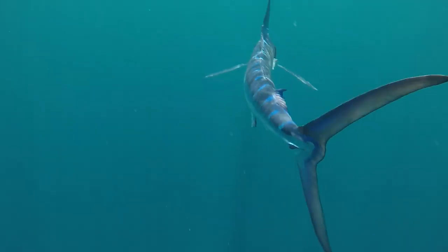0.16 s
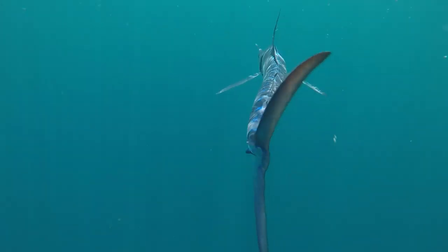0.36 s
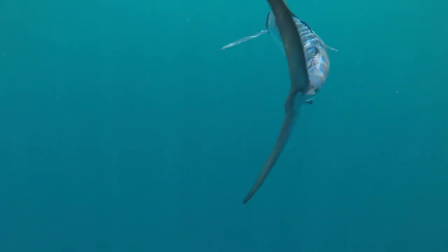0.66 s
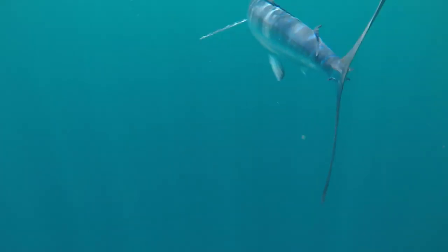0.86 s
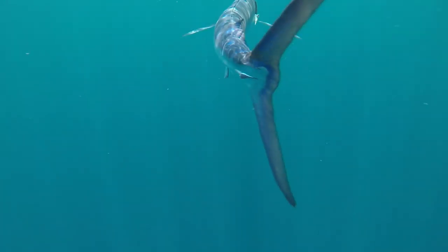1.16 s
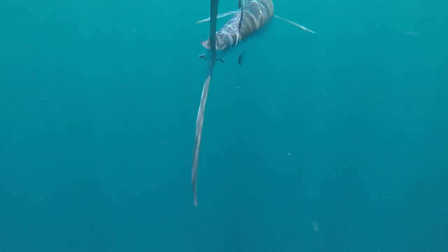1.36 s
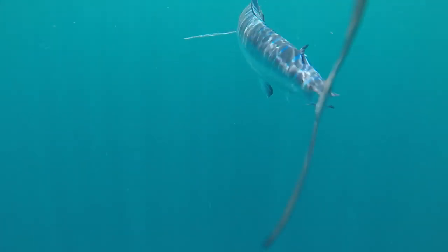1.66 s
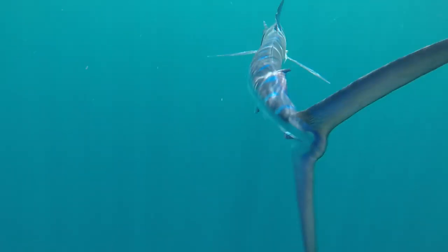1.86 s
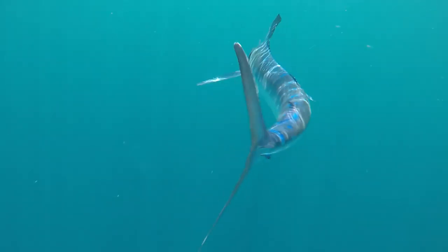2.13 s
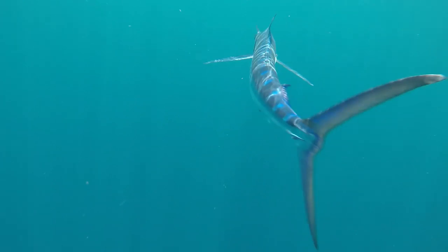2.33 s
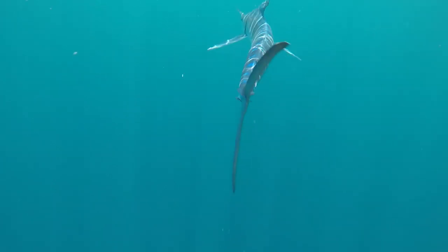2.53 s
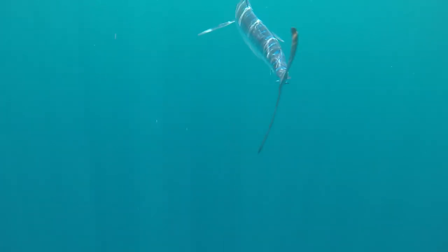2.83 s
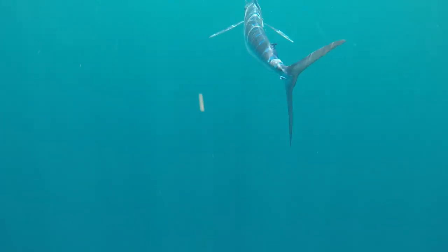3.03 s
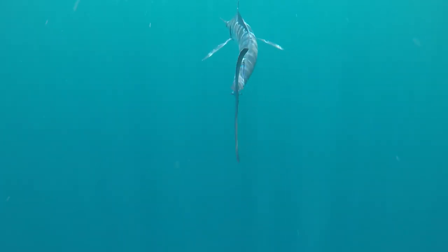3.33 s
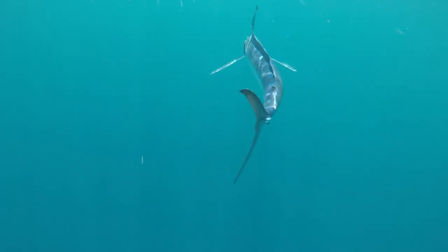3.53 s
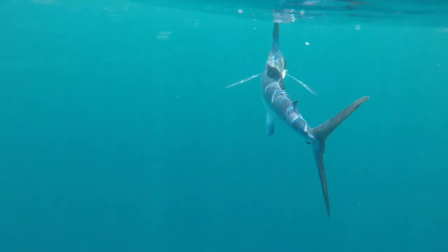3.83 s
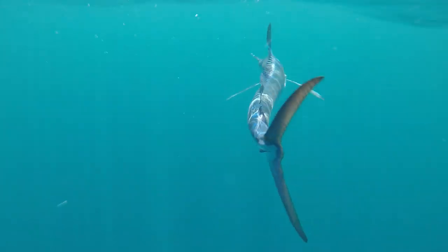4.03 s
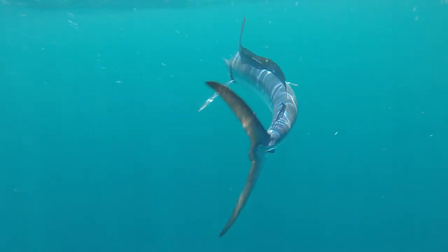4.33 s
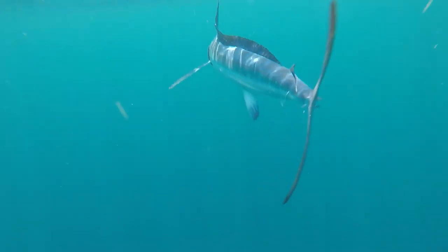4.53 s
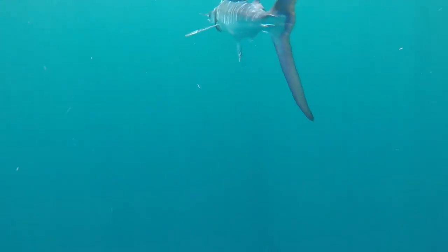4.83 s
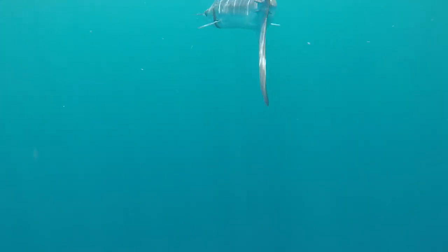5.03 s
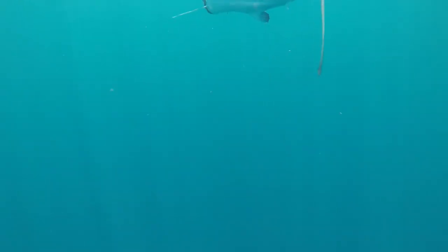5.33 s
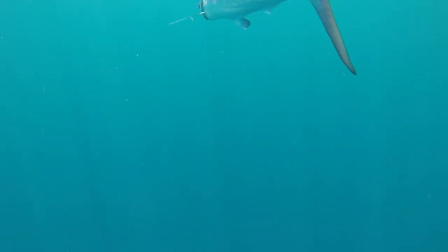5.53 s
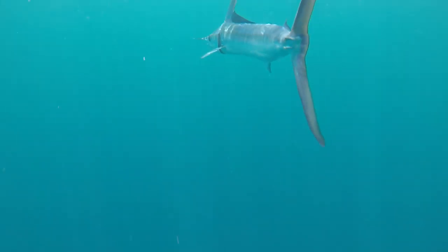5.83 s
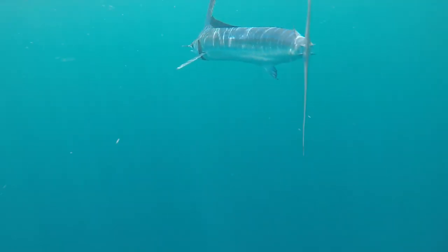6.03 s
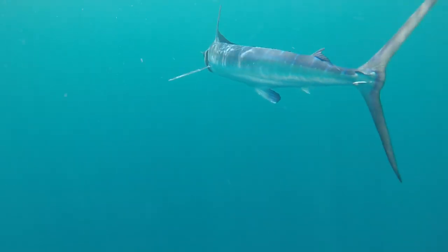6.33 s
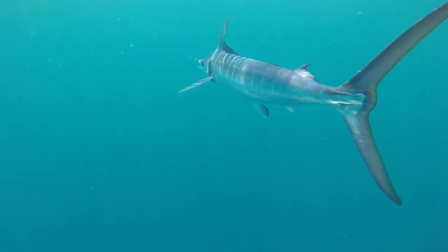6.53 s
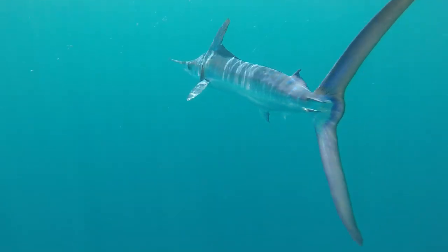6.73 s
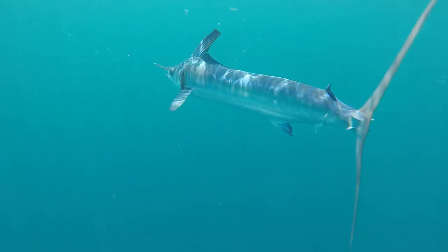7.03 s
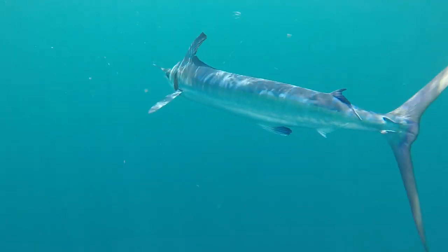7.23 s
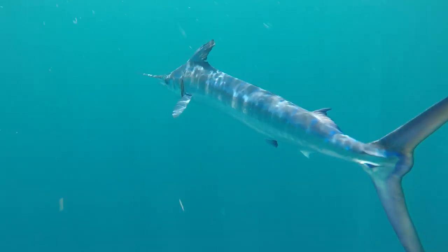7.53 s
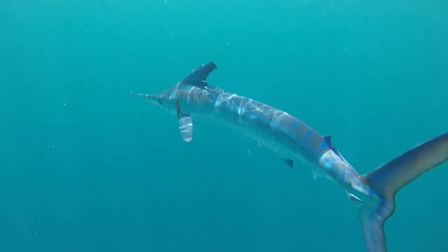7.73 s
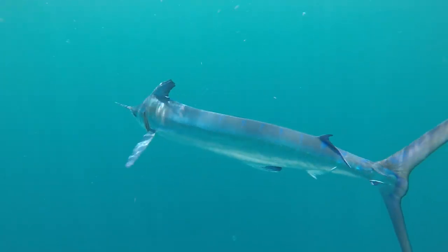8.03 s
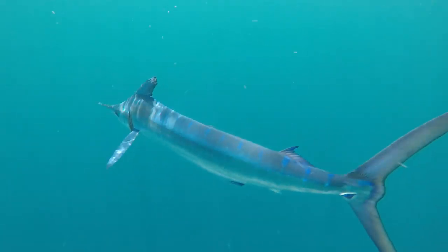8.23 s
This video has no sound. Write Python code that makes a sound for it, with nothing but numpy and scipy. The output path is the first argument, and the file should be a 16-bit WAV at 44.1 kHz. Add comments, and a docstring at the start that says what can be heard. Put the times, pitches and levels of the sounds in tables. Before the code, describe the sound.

A camera housing on a pole is dragged under the sea behind a boat, heard close up from right at its shell. A low wavering shudder and dull knocks run throughout, while bubbles gurgle, tick and pop. Early on, the wet grip gives a short moan and the clamp rasps and creaks. Water drumming on the shell grows into a louder, rough wash in the second half, sputtering near the end.

```python
"""A low shudder and knocks, close up: a camera housing on a pole, dragged under the sea behind a boat.
Shed vortices swing the pole near 45 Hz and it takes jolts; the wet grip moans, its clamp creaks and
rasps, bubbles tick and pop all round. Eddies of the wake drum on the shell and ring its modes, growing
to a rough wash. One microphone, right at the shell; a limiter holds the loudest peaks."""
import sys
import numpy as np
from scipy import signal
from scipy.fft import rfft, irfft
from scipy.io import wavfile
from scipy.ndimage import uniform_filter1d, minimum_filter1d

SR = 44100
rng = np.random.default_rng(int(sys.argv[2]) if len(sys.argv) > 2 else 0)


def wav_out(sig):
    """Save sig, one row per channel (or a flat mono array), as 16-bit PCM at SR to the path in sys.argv[1]."""
    wavfile.write(sys.argv[1], SR, np.round(np.clip(np.atleast_2d(sig).T, -1, 1) * 32767).astype(np.int16))


N = 369558
T = np.arange(N) / SR
HZ = np.arange(N // 2 + 1) * SR / N
CEILING, TOP_HZ = .96, 15400

# stream of bubbles passing the housing: t/s, base level/dB
GURGLE = [(0, -31), (.15, -25.5), (.22, -38), (.6, -32), (.85, -34), (1.1, -31), (1.5, -25), (2.2, -30),
          (2.9, -19.5), (3.5, -10.5), (3.7, -29), (4.1, -17.5), (4.4, -36), (5, -28), (6, -33), (7, -40),
          (7.8, -42), (8.0, -30), (8.38, -38)]
# grit and bursting specks of air: t/s, level/dB, centre f/Hz
TICKS = [(1.7494, -33, 6500), (1.864, -34, 7400), (1.875, -40, 8500), (1.8925, -37, 8900),
         (1.9015, -39, 7000), (1.9205, -45, 7500), (1.937, -42, 7500), (2.3921, -45, 7000),
         (2.879, -49, 7250), (3.1214, -39, 7600), (3.1618, -38, 6800), (3.174, -34, 7500),
         (3.1965, -34, 6300), (3.218, -30, 4700), (3.2307, -37, 7300), (3.2425, -35, 6800),
         (3.262, -40, 5900), (3.4592, -42, 9500), (3.481, -40, 5500), (3.5085, -43, 8500),
         (3.5741, -46, 10500), (3.579, -41, 8870), (4.0009, -46, 9050), (4.4135, -45, 7210),
         (4.7662, -41, 7100), (4.9977, -42, 7800), (5.978, -31, 4100), (6.1061, -43, 9300),
         (6.3668, -41, 7400)]
# the grip slipping evenly: t/s, f/Hz, level/dB
MOAN = [(.33, 213.5, -40), (.355, 213.4, -24.5), (.39, 192, -21), (.43, 214, -29), (.48, 221, -32),
        (.505, 199, -25), (.535, 193.6, -24), (.575, 199, -21), (.60, 185.6, -25.5)]
# its harmonics: multiple, relative level/dB
MOAN_HARMONICS = [(1, -0.5), (2, -13), (3, -9.5), (4, -24.5), (5, -32)]
# wet slips and squirts at the clamp: t/s, length/s, slip rate/Hz, ring f/Hz, width/Hz, level/dB
CREAKS = [(.008, 0.047, 200, 1100, 900, -43), (.07, .015, 300, 1700, 1200, -43),
          (0.099, 0.044, 260, 1500, 1300, -41), (.59, 0.032, 240, 1200, 800, -41),
          (0.689, 0.0063, 300, 1600, 1900, -29), (0.705, 0.0055, 300, 2300, 1900, -36.5),
          (0.768, 0.165, 450, 2540, 1790, -39), (.849, .008, 300, 5300, 2000, -54),
          (1.858, 0.0082, 400, 3440, 1030, -25.5), (1.86, 0.0093, 360, 2200, 930, -22),
          (1.868, 0.0029, 400, 3300, 2400, -32), (1.882, 0.011, 650, 3360, 1200, -28),
          (1.862, 0.048, 550, 8000, 8000, -52), (2.227, 0.02, 310, 4970, 2400, -46),
          (2.27, 0.024, 300, 5300, 2000, -48.5), (3.161, 0.024, 486, 3530, 700, -17.5),
          (3.195, 0.008, 570, 3350, 600, -15), (3.143, .017, 550, 3820, 400, -34),
          (3.217, 0.023, 600, 2120, 2420, -17), (3.162, 0.028, 430, 2300, 1910, -22),
          (3.196, 0.013, 430, 2300, 1800, -26), (3.161, 0.033, 540, 5000, 2600, -36),
          (3.196, 0.011, 460, 4800, 2800, -36), (3.217, 0.028, 420, 5200, 3000, -39),
          (3.284, 0.29, 190, 3500, 420, -45.5)]
# the clamp rasping: t/s, slip rate/Hz, level/dB, factor on its mode pitches as the grip loads it
RASP = [(.768, 115, -28, .92), (.78, 115, -29, 0.98), (.81, 122, -32, 0.97), (.84, 153, -29, 0.89),
        (.87, 155, -31, 1.03), (.89, 160, -30, 1.03), (.92, 180, -23, 1), (.936, 184, -29, 1.05)]
# modes of the clamp: base f/Hz, relative level/dB, t60/s
CLAMP_MODES = [(1790, -6, .016), (2120, 0.5, .024), (2690, -9, .012), (3270, -1, 0.021), (3750, -7, .012),
               (4500, -12, .01), (5600, -26, .006)]
# bubbles, from gulps of air to tiny ticks, and two faint sharp clicks near 3.9 kHz (7.982 and 8.085 s),
# the sound of loud peaks clipping: t/s, level/dB, starting f/Hz, t60/s
POPS_AND_CLICKS = [(.0114, -27, 1030, .035), (.056, -45, 3020, 0.013), (0.076, -28, 1440, 0.026),
                   (.092, -45, 4560, 0.01), (.1052, -25, 2140, 0.018), (0.1127, -21, 977, 0.043),
                   (.113, -29, 3030, 0.015), (.119, -47, 4400, 0.0092), (.1395, -41.5, 6040, 0.0087),
                   (.158, -39, 2100, .015), (0.236, -13.5, 2010, 0.014), (.454, -25, 675, .034),
                   (.597, -9, 556, 0.043), (.85, -34, 4350, 0.019), (.9142, -35, 4460, .012),
                   (1.1058, -40, 4950, .012), (1.157, -9, 668, 0.08), (1.261, -1, 528, 0.042),
                   (1.35, -13, 624, 0.043), (1.417, -5.5, 508, 0.048), (1.46, -36, 5770, .015),
                   (1.62, -7.5, 508, 0.061), (1.675, -3, 426, 0.024), (1.707, -5, 567, 0.031),
                   (1.748, -24, 5440, 0.015), (1.757, -4.5, 640, 0.068), (1.855, -3.5, 673, 0.044),
                   (1.888, -26, 3880, 0.015), (1.9189, -25, 5500, .015), (1.9334, -21, 4770, .016),
                   (2.0303, -11, 1024, 0.029), (2.075, -30, 5290, 0.021), (2.09, -17, 2790, .025),
                   (2.04, -8, 480, .05), (2.11, -12, 496, 0.057), (2.3895, -31, 5360, 0.022),
                   (2.441, -3.5, 614, 0.042), (2.478, -10, 518, .045), (2.578, -1.5, 625, 0.036),
                   (2.6, -15, 1010, 0.042), (2.741, -5.5, 270.2, 0.056), (2.756, 0, 636, 0.046),
                   (2.806, 0, 520, 0.056), (2.8069, -31, 4070, .012), (2.84, -2.5, 766, 0.07),
                   (2.8744, -31, 5570, 0.014), (2.899, 2.5, 626, 0.037), (2.98, -6, 615, 0.044),
                   (3.039, 1, 630, 0.037), (3.083, -21, 5430, 0.0078), (3.133, -4.5, 168, 0.17),
                   (3.2203, -10, 1191, 0.025), (3.228, -9, 2070, .025), (3.2325, -2, 2036, 0.039),
                   (3.2375, -4, 2053, 0.05), (3.246, 0, 513, 0.043), (3.364, -7, 2040, 0.016),
                   (3.458, -20.5, 5265, 0.019), (3.505, -3, 690, 0.043), (3.5076, -33, 4100, .013),
                   (3.5587, -25, 4380, 0.014), (3.591, -6, 518, .051), (3.9003, -12.5, 1526, 0.035),
                   (3.9564, -26, 5660, 0.0094), (4.067, -13, 90.4, .12), (4.0741, -11, 971, 0.027),
                   (4.042, -6, 600, 0.061), (4.066, -9.5, 730, .06), (4.08, -1.5, 268, 0.15),
                   (4.15, -9, 190, 0.11), (4.16, -12.5, 592, 0.13), (4.182, -7, 616, .07),
                   (4.185, -2, 216, 0.11), (4.235, -13.5, 670, 0.082), (4.229, -3.5, 105.3, 0.13),
                   (4.37, -34, 4730, 0.013), (4.4927, -18, 2455, 0.042), (4.563, -14, 93.4, 0.12),
                   (5.016, -6, 585, 0.043), (5.157, -1, 700.5, 0.038), (5.558, -4, 607, .04),
                   (5.679, 1, 506, 0.047), (5.714, -6, 518, 0.044), (5.746, 0, 506, 0.036),
                   (5.91, -11, 598, 0.047), (6.5015, -24, 4940, 0.0098), (6.807, -6, 654, 0.031),
                   (6.841, -24.5, 3940, 0.024), (7.011, -2, 541, 0.041), (7.084, -1, 523.6, 0.052),
                   (7.804, -9, 643, 0.033), (7.875, -12, 1190, 0.037), (7.92, -6, 548, 0.045),
                   (7.972, -12.5, 1910, 0.052), (7.982, -32, 3900, 0.0075), (8.018, -28, 1886, 0.015),
                   (8.04, -20, 1840, 0.034), (8.075, -14, 1760, 0.047), (8.085, -39, 3890, 0.0087),
                   (8.128, -9.5, 1880, 0.067), (8.25, -14, 2420, 0.044), (8.19, -20, 1865, 0.034),
                   (8.295, -15, 1800, 0.042), (8.333, 3, 624, 0.036)]
# their character by pitch: f/Hz, glide, share of noise
RING_KINDS = [(260, -0.18, 0.033), (500, 0.037, 0.18), (1000, .057, 0.2), (2500, .057, 0.11),
              (3900, .043, 0.44)]
# jolts along the pole: t/s, swing of the pole/dB, thud on the shell/dB
JOLTS = [(.01, -10, -19), (0.128, -8, -15), (0.278, -8, -21), (0.314, -16, -14), (0.442, -10, -15),
         (0.589, -27, -13.5), (0.611, -14, -26), (1.16, -11.5, -47), (1.41, -25, -16.5), (1.47, -5.5, -28),
         (1.72, -16, -23), (1.899, -26, -22), (2.22, -21, -13.5), (2.56, -12, -25), (2.83, -22, -8.5),
         (3.0, -14, -18.5), (3.52, 1.5, -22), (3.69, -20, -14.5), (3.77, -12, -31), (3.891, -12, -34),
         (4.0, -13, -19), (4.06, -18, -12), (4.2, -11, -15), (4.55, -22, -32), (5.07, -19, -12),
         (5.819, -20, -1), (5.89, -19, -22), (5.96, -20, -20), (6.17, -25, -26), (6.4, -11, -34),
         (6.52, -22, -6), (6.7, -23, -1), (6.85, -20, -3), (7.17, -6.5, -29), (7.34, -25, -7),
         (7.75, -6, -31), (7.899, -25, -30)]
# steady shudder of the pole: t/s, f/Hz, base level/dB
SHUDDER = [(0, 50, -19.5), (.5, 48.16, -21), (.8, 32.67, -20.5), (1.1, 33.83, -17), (1.3, 39.4, -18.5),
           (1.75, 36.54, -13.5), (2.05, 51, -14.5), (2.25, 42.56, -17), (2.6, 45, -15), (2.8, 34.8, -12),
           (3.45, 33.9, -15.5), (3.65, 37.37, -18.5), (4.1, 57.1, -13.5), (4.4, 46.7, -23.5),
           (4.7, 39.97, -17.5), (5.4, 41.2, -13.5), (5.7, 50.1, -19.5), (6.0, 43.76, -18),
           (6.15, 57.13, -14.5), (6.6, 51.6, -16.5), (6.75, 46.1, -18.5), (7.3, 54.7, -17),
           (7.5, 42.65, -16), (7.85, 37.94, -17), (8.05, 30.2, -19.5), (8.38, 38, -21)]
# the flow stalls: centre t/s, length/s, shudder drop/dB, wake drop/dB (negative lifts)
LULLS = [(0.238, 0.093, 14, 5.5), (0.375, 0.063, 11, 2), (0.547, 0.04, 7, 1), (0.73, 0.033, 5, 2),
         (2.358, 0.031, 11, 3.5), (3.591, 0.07, 17, -1.5), (3.84, 0.12, 2, 2.5), (4.15, 0.037, 22, 1.5),
         (4.292, 0.089, 2, 3), (6.763, 0.029, 3, 10), (7.813, 0.051, -4, 1)]
# modes of the shell: f/Hz, width/Hz, level/dB
SHELL_MODES = [(99, 90, -8), (162, 100, 0), (263, 440, -4), (500, 180, -2), (640, 180, -1), (770, 180, -9),
               (1140, 150, -22), (1230, 210, -22), (1490, 130, -25), (1790, 440, -19), (2000, 220, -14),
               (2380, 570, -29), (2730, 390, -26), (3020, 490, -30), (3560, 320, -40), (3890, 800, -36),
               (4080, 250, -36), (4800, 760, -42), (5490, 600, -43), (5950, 1030, -44), (7200, 1570, -47),
               (7640, 640, -46), (8270, 230, -52), (8880, 1900, -48), (10200, 1800, -57), (11500, 810, -60),
               (12500, 1200, -68), (13500, 900, -72), (14760, 720, -70)]
# pitches at which the shell barely moves under the microphone: f/Hz, width/Hz
SHELL_NULLS = [(910, 40), (1390, 40), (1570, 40), (2200, 70), (3080, 450), (3770, 450), (5640, 590),
               (7960, 40), (8710, 900), (10840, 1500)]
# turned in the wake, the shell is driven in other modes: f/Hz, change side-on/dB, change end-on/dB
TURNED_EQ = [(900, 1, 1.5), (1240, -4, 0.5), (1530, -1, 6.5), (1630, -0.5, 6.5), (1964, -0.5, -4),
             (2150, 4.5, -1), (2580, 2.5, 1), (2700, 0.5, -9.5), (2950, -4.5, -5), (3350, 2, -5),
             (3750, 3, 1.5), (4060, -4, -6), (4440, 2, -0.5), (6000, 0, 2)]
# how the housing faces the flow: t/s, share side-on, share end-on
FACING = [(0, 0.42, 1), (.9, 0.6, 0), (1.3, 0.98, 0.09), (3.0, .9, 0.06), (4.2, 0.4, 0.4), (4.7, .05, 0.2),
          (6.5, .05, .05), (7.7, 0.3, 0.3), (7.9, 0.03, .95), (8.38, 0.01, .95)]
# six eddy sizes, largest first: low f/Hz, high f/Hz, shared surge/dB, own flicker/dB, bursts/dB
EDDY_SIZES = [(68, 120.4, -0.5, 4.5, 5.5), (145.5, 413, 1.3, -1.5, 3.5), (395, 863, 1, 1.28, 2),
              (933, 3160, 1, 1.65, 3.5), (2850, 4700, 2.5, 1.35, 4), (5000, 32000, 0.5, 1.5, 3)]
# the largest eddies: t/s, level/dB
THROB = [(0, -30), (.25, -34.5), (.45, -26), (.6, -37), (.7, -50), (1.2, -44), (1.45, -28), (2.2, -26.5),
         (2.7, -33), (3.3, -28.5), (3.7, -32), (4.15, -21), (4.4, -35), (5.2, -26), (5.9, -29),
         (6.6, -29.5), (7.3, -28.5), (7.8, -30.5), (8.38, -32)]
# the next two sizes: t/s, rumble level/dB, wash level/dB
RUMBLE_AND_WASH = [(0, -30, -31), (.2, -42, -48), (.35, -37.5, -32), (.55, -44, -43), (.72, -44, -34.5),
                   (.95, -50.5, -31), (1.25, -45, -25.5), (1.45, -29.5, -19.5), (1.6, -29.5, -21.5),
                   (1.85, -34, -24), (2.15, -32.5, -24.5), (2.28, -21.5, -22), (2.5, -23, -19.5),
                   (2.72, -32, -24), (3.1, -19, -16), (3.5, -22.5, -20.5), (3.7, -45.5, -30.5),
                   (3.95, -34, -25.5), (4.15, -20, -24.5), (4.35, -30, -26), (4.6, -21.5, -16.5),
                   (4.9, -11.5, -15), (5.3, -14.5, -14), (6.6, -13, -15), (7.3, -16.5, -13.5),
                   (7.66, -23.5, -14), (7.82, -33.5, -18.5), (7.93, -20.5, -12.5), (8.15, -20, -13.5),
                   (8.38, -21, -13.5)]
# the three smallest: t/s, level near 2 kHz/dB, near 4 kHz/dB, above 5 kHz/dB
HISS = [(0, -52, -66, -82), (.12, -51, -67, -85), (.2, -54, -72, -85), (.26, -50, -71, -85),
        (.31, -48, -69, -83), (.4, -51, -70, -82), (.48, -44.5, -65, -77.5), (.65, -45, -60, -76),
        (.75, -41, -58, -74), (.86, -34, -59, -65), (.96, -42.5, -53, -64), (1.15, -42.5, -56, -64.5),
        (1.45, -27.5, -48, -51), (1.75, -29, -43, -52), (2.05, -32.5, -42, -53.5), (2.3, -30.5, -53, -57),
        (2.45, -29.5, -45, -51.5), (2.62, -26.5, -43, -49), (2.85, -31.5, -44.5, -52.5),
        (3.08, -28.5, -41, -49.5), (3.5, -26.5, -43, -51), (3.72, -40.5, -50.5, -57.5),
        (4.3, -34, -48, -52), (4.69, -28.5, -39.5, -48.5), (5.3, -26.5, -45.5, -50),
        (6.35, -25, -44, -50.5), (6.7, -26.5, -45, -56.5), (7.1, -24, -42, -58), (7.66, -24, -42.5, -60.5),
        (7.84, -36, -46, -64), (7.89, -25, -56, -69), (8.0, -21.5, -61, -71), (8.15, -19.5, -58, -72),
        (8.38, -19.5, -60, -76)]
# a jolt's thud in the band of each eddy size: relative level/dB
THUD_BAND_DB = [-2.5, -5, -11, -34.5, -53.5, -64]
# raggedness of the wake: t/s, factor on surge, flicker and bursts
RAGGED = [(0, 0.81), (1, .9), (2.2, 1.08), (3.6, 1.03), (4.3, 0.8), (4.7, 0.63), (6, 0.88), (7.5, 0.78),
          (7.9, 0.64), (8.38, .6)]
# gaps where the wash sputters: centre t/s, length/s, drop/dB
SPUTTER = [(7.86, .02, 6), (7.905, 0.026, 10), (7.957, 0.023, 14), (8.004, 0.02, 17.5), (8.03, .012, 10),
           (8.058, .018, 7), (8.106, 0.03, 15), (8.165, 0.034, 5.5), (8.22, .025, 7.5), (8.27, .015, 2.5),
           (8.315, 0.017, 7.5)]
# factor on that drop for each eddy size
SPUTTER_SHARE = [0.05, .3, .6, 1.02, .5, 0.1]


def undb(db):
    """Decibels to gain."""
    return 10 ** (np.asarray(db) / 20)


def unit(x):
    """Scale to rms 1."""
    return x / np.sqrt(np.mean(x ** 2))


def curves(table):
    """Columns of a table, joined by straight lines in time."""
    s, *columns = np.transpose(table)
    return [np.interp(T, s, column) for column in columns]


def walk(rate_hz):
    """Random levels held 1 / rate_hz seconds and smoothed twice; rms 1."""
    hold = int(SR / rate_hz)
    steps = np.repeat(rng.standard_normal(N // hold + 1), hold)
    return unit(uniform_filter1d(uniform_filter1d(steps, hold), hold)[:N])


def swell(t, rise_s):
    """Smooth rise from 0 to 1."""
    return np.sin(np.pi / 2 * np.minimum(t / rise_s, 1)) ** 2


def resonance(hz, width_hz):
    """Response of one damped mode, gain 1 at its centre."""
    return 1j * HZ * width_hz / (hz ** 2 - HZ ** 2 + 1j * HZ * width_hz)


def through(x, response):
    """Pass a sound through a frequency response."""
    return irfft(rfft(x) * response, N)


def band(x, low_hz, high_hz, order=3):
    """Band-pass a sound and scale it to rms 1."""
    return unit(signal.sosfilt(signal.butter(order, [low_hz, high_hz], "band", fs=SR, output="sos"), x))


def rings(rows):
    """Short gliding rings that swell in; snap adds a puff of noise around the pitch."""
    out = np.zeros(N + SR)
    for s, db, hz, t60, glide, snap in rows:
        t = np.arange(int(t60 * SR)) / SR
        envelope = np.exp(-np.log(1000) * t / t60) * swell(t, .14 * t60)
        ring = np.sin(2 * np.pi * hz * t * (1 + glide * t / t60))
        if snap:
            ring += snap * band(rng.standard_normal(16384), hz / 1.35, hz * 1.45)[-len(t):]
        out[int(s * SR):int(s * SR) + len(t)] += undb(db) * envelope * ring
    return out[:N]


def gurgle(count, low_hz, high_hz):
    """A bed of random bubbles passing the housing; small ones ring high, short and faint."""
    when, smallness, luck = rng.random((count, 3)).T
    s = when * N / SR
    hz = low_hz * (high_hz / low_hz) ** smallness
    scatter_db = -2.5 * np.log(1 - .97 * luck)
    db = np.interp(s, *np.transpose(GURGLE)) - 5 * np.log2(hz / low_hz) + scatter_db
    t60, glide, snap = 28 / hz, np.full(count, .12), np.zeros(count)
    return rings(zip(s, db, hz, t60, glide, snap))


def ticks(rise_s=.00066, half_width_octaves=.37):
    """Grit and bursting specks of air, each a brief wide crack of noise."""
    out, t = np.zeros(N), np.arange(512) / SR
    envelope = t / rise_s * np.exp(1 - t / rise_s)
    spread = 2 ** half_width_octaves
    for s, db, hz in TICKS:
        crack = band(rng.standard_normal(len(t)), hz / spread, min(hz * spread, TOP_HZ))
        out[int(s * SR):int(s * SR) + len(t)] += undb(db) * crack * envelope
    return out


def moan():
    """Even stick-slip of the wet grip: a short harmonic tone."""
    hz, db = curves(MOAN)
    phase = 2 * np.pi * np.cumsum(hz * (1 + .03 * walk(61))) / SR
    tone = sum(undb(harmonic_db) * np.cos(k * phase) for k, harmonic_db in MOAN_HARMONICS)
    gate = np.interp(T, [.31, .33, .6, .62], [0, 1, 1, 0])
    return np.sqrt(2) * tone * undb(db) * gate


def rasp():
    """Nearly even, countable slips, each striking the clamp's modes with its own mix."""
    s, rate_hz, db, stretch = np.transpose(RASP)
    out, t = np.zeros(N), np.arange(1024) / SR
    at = s[0]
    for gap_luck, *mode_luck, level_luck in rng.standard_normal((64, 2 + len(CLAMP_MODES))):
        if at >= s[-1]:
            break
        ring, load = 0, np.interp(at, s, stretch)
        for (hz, mode_db, t60), luck in zip(CLAMP_MODES, mode_luck):
            decay = np.exp(-np.log(1000) * t / t60)
            ring += undb(mode_db + 2.9 * luck) * decay * np.sin(2 * np.pi * hz * load * t)
        gain = undb(np.interp(at, s, db) + 2.5 * level_luck)
        out[int(at * SR):int(at * SR) + len(t)] += gain * ring * swell(t, rise_s=.0009)
        at += np.exp(.13 * gap_luck) / np.interp(at, s, rate_hz)
    return out


def creaks():
    """Trains of uneven slips, each a soft puff of scraping noise, ringing the clamp."""
    out, size = np.zeros(N), 16384
    t = np.arange(512) / SR
    puff = t * np.exp(-t / .0012)
    for s, length_s, rate_hz, hz, width_hz, db in CREAKS:
        gap_luck, level_luck = rng.standard_normal((256, 2)).T
        gaps = np.exp(.4 * gap_luck) / rate_hz
        at = np.cumsum(gaps) - gaps[0]
        slips = np.zeros(size)
        slips[(at[at < length_s] * SR).astype(int)] = undb(2.5 * level_luck[at < length_s])
        scrape = np.convolve(slips, puff)[:size] * rng.standard_normal(size)
        ring = band(scrape, hz - width_hz / 2, hz + width_hz / 2, order=4)
        out[int(s * SR):int(s * SR) + size] += undb(db) * ring * np.sqrt(length_s * SR / size)
    return out


def pops_and_clicks():
    """Big air pockets sag in pitch, small bubbles rise and snap; two faint sharp clicks near the end."""
    kind_hz, glide, snap = np.transpose(RING_KINDS)
    return rings((s, db, hz, t60, np.interp(hz, kind_hz, glide), np.interp(hz, kind_hz, snap))
                 for s, db, hz, t60 in POPS_AND_CLICKS)


def jolts(column, rise_s, fall_s):
    """Gain over time: each jolt on the pole swells in and dies away."""
    out = np.zeros(N)
    for row in JOLTS:
        t = np.maximum(T - row[0], 0)
        out += undb(row[column]) * swell(t, rise_s) * np.exp(-np.maximum(t - rise_s, 0) / fall_s)
    return out


def dips_db(table, column):
    """Level change over time: a short bell-shaped dip for each row."""
    return -sum(row[column] * np.exp(-(2 * (T - row[0]) / row[1]) ** 2) for row in table)


def shudder():
    """Shed vortices swing the pole: a wavering tone over looser low buffeting; jolts set it ringing."""
    hz, db = curves(SHUDDER)
    tone = np.sin(2 * np.pi * np.cumsum(hz * (1 + .0654 * walk(25))) / SR)
    buffet = through(rng.standard_normal(N), resonance(38, 67) / np.sqrt(1 + (HZ / 62) ** 12))
    jolt_gain = jolts(column=1, rise_s=.018, fall_s=.029)
    swing = np.sqrt(2) * tone * np.hypot(undb(db - 2.5 + 1.6 * walk(22)), jolt_gain)
    return swing + undb(db - 1) * unit(buffet)


def shell():
    """The shell's response at the microphone: steep-sided modes, with sharp gaps at the still points."""
    power = sum((undb(db) * np.abs(resonance(hz, width)) ** 3) ** 2 for hz, width, db in SHELL_MODES)
    notches = np.prod([1 - .8 * resonance(hz, width) for hz, width in SHELL_NULLS], axis=0)
    return np.sqrt(power) * notches


def facings():
    """The housing turns in the wake: a share over time and a shell response for each way it faces."""
    side, end = np.clip(curves(FACING), 0, 1)
    hz, *changes = np.transpose(TURNED_EQ)
    front = shell()
    side_on, end_on = [front * undb(np.interp(np.log(HZ + 1), np.log(hz), db)) for db in changes]
    return [(np.maximum(1 - side - end, 0), front), (side, side_on), (end, end_on)]


def wake():
    """Eddies of six sizes drum on the shell; all surge together, each also flickers alone; jolts thud."""
    sputter_db = dips_db(SPUTTER, column=2)
    surge, responses, out = walk(22), facings(), 0
    levels = curves(THROB) + curves(RUMBLE_AND_WASH) + curves(HISS)  # one curve for each size
    ragged, = curves(RAGGED)
    thuds = jolts(column=2, rise_s=.006, fall_s=.017)
    for eddy, db, thud_db, sputter_share in zip(EDDY_SIZES, levels, THUD_BAND_DB, SPUTTER_SHARE):
        low_hz, high_hz, surge_db, flicker_db, burst_db = eddy
        strengths = np.minimum(rng.exponential(size=N // 128 + 1), 3)  # a new burst about every 3 ms
        bursts = uniform_filter1d(np.repeat(strengths, 128)[:N], size=128)
        rough_db = surge_db * surge + flicker_db * walk(35) + burst_db * (bursts - 1.5)
        pressure = rng.standard_normal(N) * undb(ragged * rough_db)
        passband = 1 / np.sqrt((1 + (low_hz / (HZ + 1)) ** 16) * (1 + (HZ / high_hz) ** 16))
        drumming = sum(share * through(pressure, response * passband) for share, response in responses)
        gain = np.hypot(undb(db + sputter_share * sputter_db), undb(thud_db) * thuds)
        out += gain * unit(drumming)
    return out


def scene():
    """Under water astern of the boat: flow, grip and bubbles sum at the housing's one microphone."""
    pole = shudder() * undb(dips_db(LULLS, column=2))
    eddies = wake() * undb(dips_db(LULLS, column=3))
    grip = moan() + creaks() + rasp()
    patter = ticks() + pops_and_clicks() + gurgle(count=1100, low_hz=434, high_hz=1277)
    return (pole + eddies + grip + patter)[None]


def record(dry):
    """A quick limiter holds the loudest peaks under its ceiling; the top is cut."""
    needed_gain = np.minimum(CEILING / (np.abs(dry) + 1e-9), 1)
    held_gain = minimum_filter1d(needed_gain, size=385)
    gain = uniform_filter1d(uniform_filter1d(held_gain, size=192), size=192)
    top_cut = signal.ellip(8, .2, 70, TOP_HZ, fs=SR, output="sos")
    return signal.sosfilt(top_cut, dry * gain)


dry = scene()
out = record(dry)
wav_out(out)
```